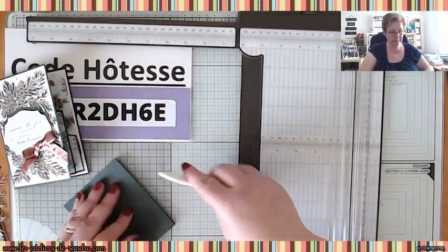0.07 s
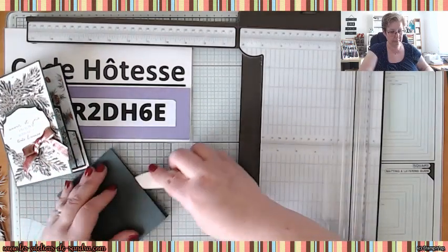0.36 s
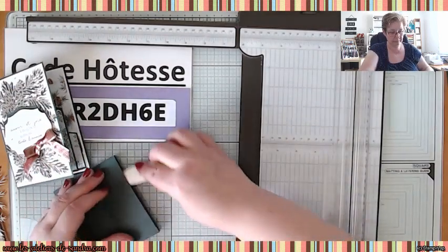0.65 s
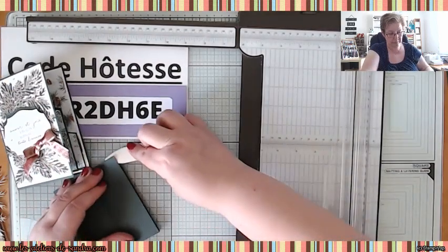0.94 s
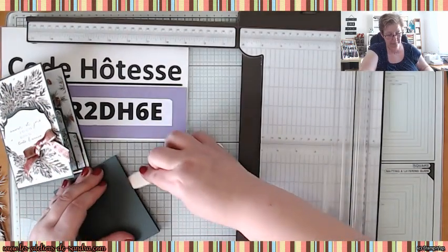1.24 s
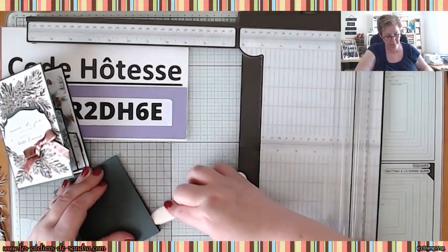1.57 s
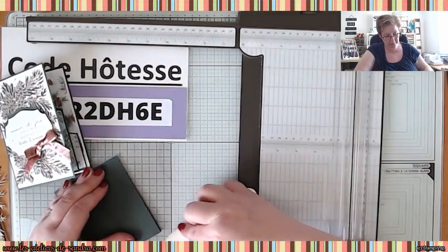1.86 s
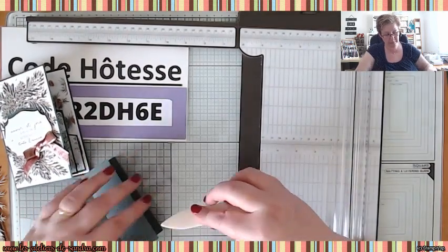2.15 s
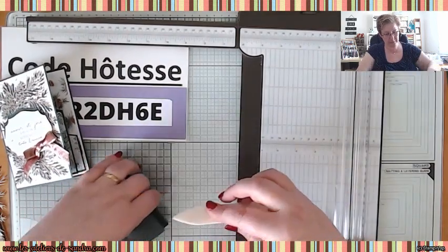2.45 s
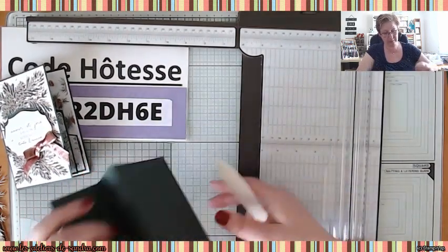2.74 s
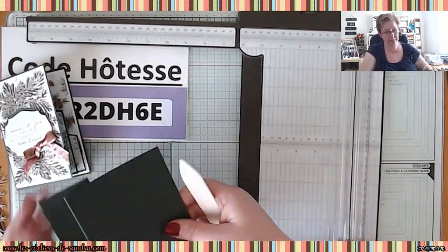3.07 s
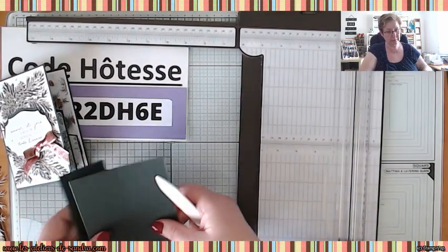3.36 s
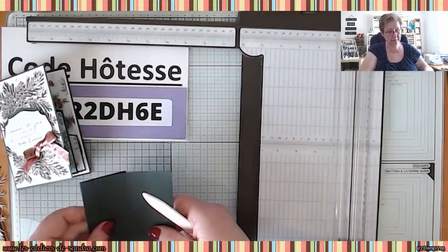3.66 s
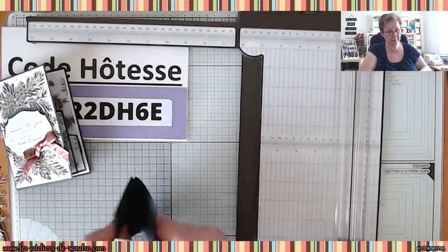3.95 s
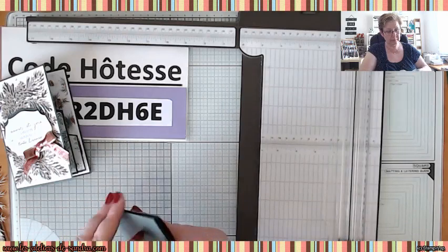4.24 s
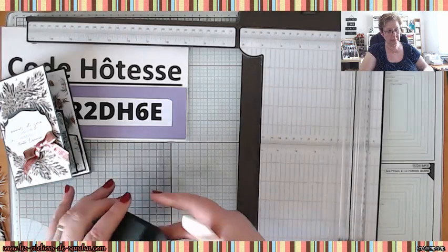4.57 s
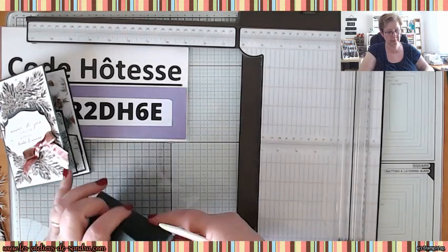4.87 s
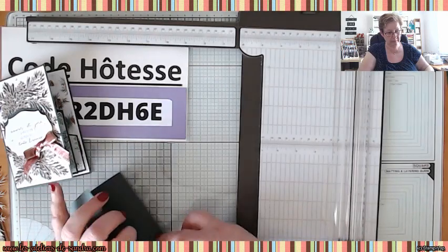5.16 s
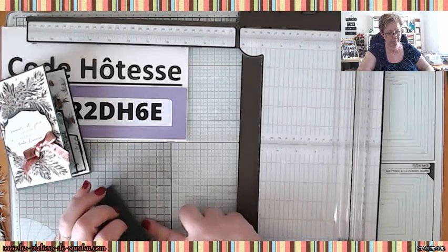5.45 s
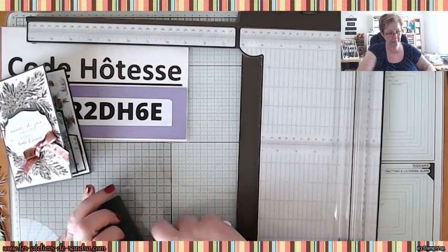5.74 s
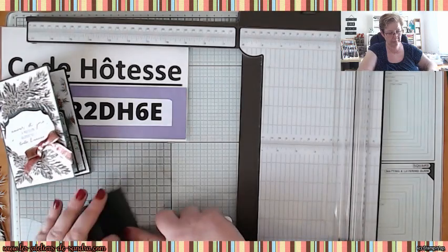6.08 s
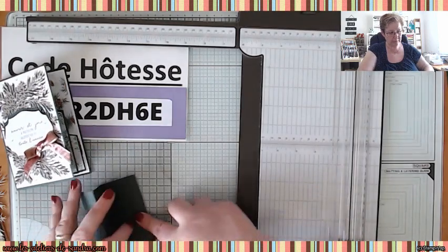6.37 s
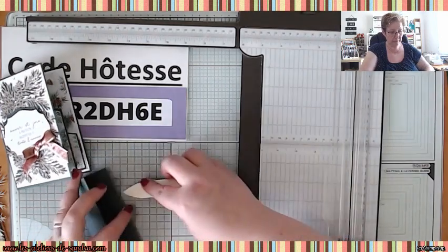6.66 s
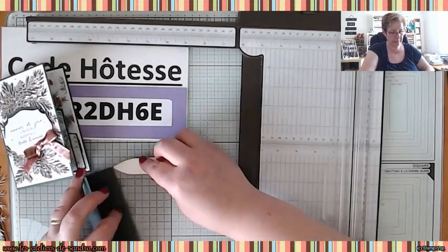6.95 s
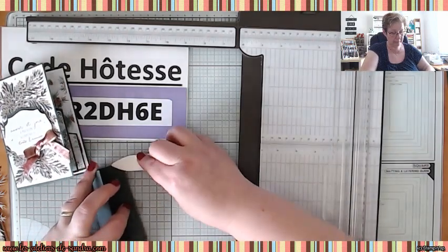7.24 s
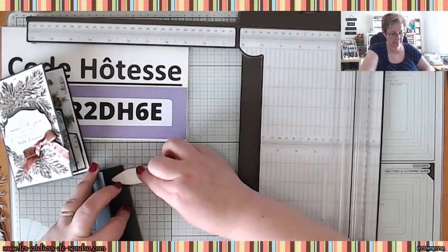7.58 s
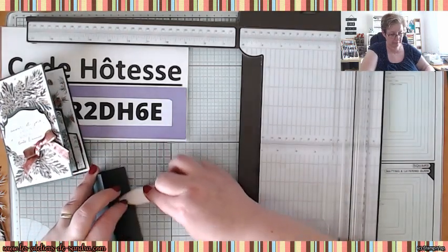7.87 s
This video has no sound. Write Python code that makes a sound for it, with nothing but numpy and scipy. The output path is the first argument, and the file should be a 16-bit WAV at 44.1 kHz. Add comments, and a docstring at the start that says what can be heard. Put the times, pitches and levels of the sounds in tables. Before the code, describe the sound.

A bone folder rubs softly along a fold in cardstock, its tip clicking lightly over the edge. It slips off and snaps down hard on the table, by far the loudest sound. Fingers then hiss over the sheet as they turn and refold it, with dry ticks, scuffs and soft hand bumps. More short creasing strokes and taps follow, heard close in a small, quiet room.

```python
"""A bone folder creases cardstock on a craft table in a small room.
It rubs along the fold as paper fibres catch and let go. Its tip clicks over the card's far edge,
and once it slips off the near end and snaps down hard. Fingers hiss over the sheet as they turn it,
the flaps tick and buckle, and hands bump the table, all over a faint room tone."""
import sys
import numpy as np
from scipy import signal
from scipy.fft import rfft, irfft, next_fast_len
from scipy.io import wavfile
from scipy.ndimage import uniform_filter1d, map_coordinates

SR = 44100
rng = np.random.default_rng(int(sys.argv[2]) if len(sys.argv) > 2 else 0)


def wrap_up_sound(samples):
    """Save the sound to the file named by the first command line argument, as 16-bit audio."""
    columns = np.atleast_2d(samples).T
    # keep every value between -1 and 1, then stretch to whole-number steps
    tamed = np.clip(columns, -1, 1)
    steps = np.round(tamed * 32767).astype(np.int16)
    wavfile.write(sys.argv[1], SR, steps)


N = 348827


def amp(db):
    """Decibels to gain."""
    return 10 ** (np.asarray(db) / 20)


def unit(x):
    """Scale to rms 1."""
    return x / np.sqrt(np.mean(x ** 2) + 1e-20)


def along(points, hz):
    """Read (freq_hz, value) points on a log frequency axis."""
    freqs, values = np.transpose(points)
    return np.interp(np.log(hz + 1), np.log(freqs + 1), values)


def wobble(rate):
    """A smooth random curve, rate knots a second."""
    knots = rng.standard_normal(int(N * rate / SR) + 4)
    return map_coordinates(knots, [np.arange(N) * rate / SR])


def filtered(x, response):
    """Filter x by the gain response(hz)."""
    size = next_fast_len(len(x) + 8192)
    return irfft(rfft(x, size) * response(np.fft.rfftfreq(size, 1 / SR)), size)[:len(x)]


def coloured(x, eq):
    """x through a (freq_hz, gain_db) EQ, at rms 1."""
    return unit(filtered(x, lambda hz: amp(along(eq, hz))))


def impulse(gain, size=4096):
    """The minimum-phase click whose spectrum is gain(hz)."""
    spectrum = np.maximum(gain(np.fft.rfftfreq(size, 1 / SR)), 1e-7)
    cepstrum = irfft(np.log(spectrum))
    cepstrum[1:size // 2] *= 2
    cepstrum[size // 2 + 1:] = 0
    return irfft(np.exp(rfft(cepstrum)))


def resonances(modes, hz):
    """Gain of a bank of steep-sided resonances."""
    return np.sqrt(sum(amp(db) ** 2 * np.abs(hz * width / (pitch ** 2 - hz ** 2 + 1j * hz * width)) ** 3
                       for pitch, width, db in modes))


def add(track, start_s, sound):
    """Mix a sound into the track."""
    part = track[max(round(start_s * SR), 0):][:len(sound)]
    part += sound[:len(part)]


def sweeps(rows, ends_db):
    """Envelope of sliding gestures: each swells and fades with hand speed, ends_db down at its ends."""
    t = np.arange(N) / SR
    return np.sqrt(sum(amp(db - np.minimum(ends_db * (2 * (t - peak_s) / length_s) ** 2, 100)) ** 2
                       for peak_s, length_s, db in rows))


# Room tone EQ: freq_hz, gain_db
ROOM_TONE_EQ = [(20, -9), (50, -5), (80, -11), (130, -10.5), (200, -13.5), (320, -16.5), (420, -11.5),
                (560, -20), (1200, -23), (2400, -27.5), (4000, -33.5), (16000, -34.5)]
def room_tone(level_db=-75):
    """A faint, steady bed of dark noise."""
    return amp(level_db) * coloured(rng.standard_normal(N), ROOM_TONE_EQ)


# Reverb time of the small room: freq_hz, t60_s
ROOM_DECAY = [(150, 0.36), (700, 0.24), (1600, .23), (3500, .26), (8000, .24), (15000, .23)]
def in_room(sound, near_db, near_t60, room_db, bright_db, direct_hz):
    """Low-passed direct sound, near scatter off the table top, and a brightened tail from the walls."""
    t = np.arange(SR // 2) / SR
    near = rng.standard_normal(len(t)) * amp(-60 * t / near_t60) * (1 - np.exp(-t / 0.00065))
    hz, when, bands = signal.stft(rng.standard_normal(len(t)), SR, nperseg=256)
    bands *= amp(-60 * when / along(ROOM_DECAY, hz)[:, None])
    tail = signal.istft(bands, SR, nperseg=256)[1][:len(t)]
    tail *= 1 - np.exp(-(t / 0.004) ** 2)
    tail = filtered(tail / np.linalg.norm(tail), lambda f: amp(along([(1500, 0), (7000, bright_db)], f)))
    paths = amp(near_db) * near / np.linalg.norm(near) + amp(room_db) * tail
    add(paths, 0, impulse(lambda f: 1 / np.hypot(1, (f / direct_hz) ** 2)))
    return signal.fftconvolve(sound, paths)


def friction(eq, slips_per_s, slip_share):
    """Paper fibres catch and let go: a dense rush with scattered larger slips, which the room answers."""
    slips = (rng.random(N) < slips_per_s / SR) * rng.standard_normal(N)
    slips = in_room(slips, near_db=1.5, near_t60=0.021, room_db=-1, bright_db=3.5, direct_hz=4500)[:N]
    rush = rng.standard_normal(N)
    return coloured(np.sqrt(1 - slip_share) * rush + np.sqrt(slip_share) * unit(slips), eq)


# Soft hand thumps: start_s, relative_level_db, pitch_hz
HAND_BUMPS = [(0.141, -53, 64), (0.653, -55, 63), (1.143, -60, 106), (1.708, -59.5, 61.8),
              (1.82, -55.5, 105), (2.09, -54, 113), (2.407, -47, 182.6), (2.464, -46, 144),
              (2.649, -48.5, 109), (2.856, -52.5, 62.3), (3.002, -48, 60), (3.141, -50, 136.5),
              (3.399, -47.5, 114), (4.195, -58, 147), (4.425, -55, 181), (4.604, -53.5, 174),
              (5.148, -45, 157.4), (5.757, -53, 102), (6.05, -42.5, 116), (6.786, -45.5, 115.5),
              (7.029, -53, 65)]
def hands_on_table(press, rest_db=-79, press_db=-7.5, settle_s=0.16):
    """Hands keep the table top rumbling in lumps, more as they press; each bump booms briefly."""
    t = np.arange(SR // 3) / SR
    rumble_eq = [(20, -1), (55, 3.5), (130, -1), (220, -9.5), (500, -20.5), (2000, -71.5)]
    thud_eq = [(25, -5), (150, 1.5), (350, -12.5), (1200, -43)]
    rumble = coloured(rng.standard_normal(N), rumble_eq)
    weight = amp(rest_db) + amp(press_db) * uniform_filter1d(press, int(settle_s * SR))
    out = weight * amp(2.5 * wobble(11)) * rumble
    envelope = amp(-60 * t / 0.24) * (1 - np.exp(-t / 0.0024))
    for start_s, db, hz in HAND_BUMPS:
        boom = np.sin(2 * np.pi * hz * t) + 0.58 * coloured(rng.standard_normal(len(t)), thud_eq)
        add(out, start_s, amp(db - 2.5) * boom * envelope)
    return out


# Fingers turning and folding the sheet: peak_s, length_s, level_db
FINGER_SWIPES = [(0.02, 0.25, -57.5), (0.22, 0.22, -64), (0.42, 0.25, -66.5), (0.73, 0.4, -67),
                 (2.65, 0.24, -61.5), (3.07, 0.17, -57.5), (3.23, 0.17, -59.5), (3.465, 0.11, -53),
                 (3.58, 0.16, -63), (3.79, 0.19, -66), (3.93, 0.2, -58.5), (4.04, 0.16, -59),
                 (4.22, 0.18, -60.5), (4.325, 0.17, -61), (4.44, .19, -59), (4.65, 0.38, -60.5),
                 (4.97, 0.17, -61), (5.17, 0.19, -59), (5.31, 0.12, -61), (5.5, 0.22, -56),
                 (5.82, 0.16, -69), (5.98, 0.41, -62), (6.29, 0.37, -65), (6.56, 0.43, -61.5),
                 (6.79, 0.32, -66.5), (7.39, 0.11, -66)]
def swipe_envelope():
    """The swell and fade of fingers sweeping over the card."""
    return sweeps(FINGER_SWIPES, ends_db=12.5)


# Bright EQ of sliding on paper: freq_hz, gain_db
HISS_EQ = [(300, -3.5), (1000, -4), (1600, -6.5), (2500, 0), (4500, 0), (7000, -1.5), (10000, -0.5),
           (14000, -1), (16000, -4)]
def finger_hiss(press, swipe, pressure):
    """Fingers hiss over the sheet; a press brings a little hiss too."""
    envelope = np.hypot(swipe, amp(-12) * press) * amp(1.5 + 0.5 * pressure)
    return envelope * friction(HISS_EQ, slips_per_s=220, slip_share=0.47)


# Hollow between hand, card and mat: pitch_hz, width_hz, gain_db
HOLLOW_MODES = [(620, 83, 8), (1120, 390, 2), (2160, 220, 4.5), (2920, 550, -2), (4480, 350, -5)]
# Pushes of the folded card: peak_s, length_s, level_db
CARD_PUSHES = [(4.67, 0.29, -60), (4.99, 0.29, -62), (6.28, 0.19, -64), (6.39, .1, -62)]
def cupped_slide(pressure):
    """The card slides under a cupped hand, whose hollow colours the friction."""
    hiss = friction(HISS_EQ, slips_per_s=250, slip_share=0.75)
    slide = unit(filtered(hiss, lambda hz: resonances(HOLLOW_MODES, hz)))
    return sweeps(CARD_PUSHES, ends_db=17.5) * amp(pressure) * slide


# The card's broad response to a contact: freq_hz, gain_db
CARD_EQ = [(120, -10.5), (400, -11), (650, -1.5), (1500, -3), (3000, -3.5), (4200, -6), (6000, -10.5),
           (9000, -15.5), (15000, -16.5)]
# Bending modes of the folded sheet: pitch_hz, width_hz, gain_db
BENDING_MODES = [(663, 140, 2), (1065, 240, 6.5), (2230, 400, -0.5)]
def card_contact(body_db, crisp_db, grip_db):
    """One damped tap: body sets the lows, crispness the highs; each grip shifts the EQ and modes."""
    touch_eq = [(850, body_db), (1750, 0), (2300, 0), (4200, crisp_db)]
    grip_hz = np.geomspace(400, 6000, 28)
    grip_eq = np.column_stack([grip_hz, rng.normal(0, grip_db, len(grip_hz))])
    tuning = np.exp(rng.normal(0, 0.15))
    return impulse(lambda hz: amp(along(CARD_EQ, hz) + along(touch_eq, hz) + along(grip_eq, hz))
                   * np.hypot(1, resonances(BENDING_MODES, hz / tuning)))


def card_crackle(swipe, snaps_per_s=28, spread_db=2.5):
    """The sheet flexes under the moving fingers and gives off scattered tiny snaps."""
    snaps = (rng.random(N) < snaps_per_s / SR) * amp(spread_db * np.clip(rng.standard_normal(N), -2, 2))
    snaps = in_room(snaps, near_db=-0.5, near_t60=0.013, room_db=-5, bright_db=4, direct_hz=9000)[:N]
    return amp(-13) * swipe * coloured(snaps, CARD_EQ)


# Card flicks and fingertip taps: start_s, relative_level_db, body_db, crisp_db
CARD_TICKS = [(0.127, -57.5, 16.5, -3), (0.369, -37.5, -13, -8), (0.406, -40, -14, -7.5),
              (0.598, -42, -14, -6), (1.817, -55, 2, -9), (2.087, -58, 15.5, -10), (2.586, -35, -3, -9),
              (2.848, -62.5, 17.5, -6), (2.96, -48.5, 6, 0), (3.003, -41, 8, 0.5), (3.171, -33.5, -3.5, -3),
              (3.394, -56.5, 15.5, 11), (3.48, -31.5, -9.5, -1), (3.84, -49.5, 2.5, -6),
              (4.066, -34, -4.5, 5.5), (4.191, -43, 12.5, 8), (4.61, -59, 16, -5), (4.917, -39, 2.5, -8),
              (5.146, -26, 0, -9), (5.268, -26, -3, -27), (5.388, -37.5, -4, -22), (5.451, -28, -1.5, -19),
              (5.752, -45, 8.5, -4), (5.79, -39, 0, -1), (6.388, -35.5, 6, -12), (6.469, -25, -8, -3),
              (6.757, -25, -3.5, -14.5), (6.899, -32.5, -16, -11.5), (7.02, -61.5, 15, -13),
              (7.17, -39.5, -20, -9.5), (7.865, -59, 20, -6)]
def card_ticks(tick_delay_s=0.001498):
    """Single dry contacts: a wide flap gives more body, a nail or an edge more crispness."""
    out = np.zeros(N)
    for start_s, db, body_db, crisp_db in CARD_TICKS:
        tick = card_contact(body_db, crisp_db, grip_db=3)
        tick = in_room(tick, near_db=-2, near_t60=0.014, room_db=-3, bright_db=6, direct_hz=6000)
        add(out, start_s + tick_delay_s, amp(db + 19.5) * tick)
    return out


# Short skids: start_s, relative_level_db, body_db, crisp_db
CARD_SCUFFS = [(0.026, -37.5, 3, -11), (0.185, -39.5, -6, -11), (2.581, -29.5, 0, -10),
               (2.644, -41.5, 3, -1), (2.682, -43, 4.5, 9.5), (3.056, -28.5, -1, -7), (3.069, -28, -10, 0),
               (3.137, -35.5, -11, 1), (3.281, -39, 2.5, -5), (4.432, -35, 2.5, -4), (5.15, -31, 0.5, -10),
               (5.496, -34.5, 6, -10), (6.045, -31, -3, -6.5), (6.461, -27.5, -7.5, -2),
               (6.572, -34, -7, 0), (6.851, -36.5, -7.5, -14), (6.946, -39, -4, -11),
               (7.388, -34.5, -6.5, -10)]
def card_scuffs():
    """An edge or a nail skids: strong scatter smears one contact into a quick run of tiny ones."""
    out = np.zeros(N)
    for start_s, db, body_db, crisp_db in CARD_SCUFFS:
        scuff = card_contact(body_db, crisp_db, grip_db=4.5)
        scuff = in_room(scuff, near_db=11, near_t60=0.062, room_db=5.5, bright_db=4, direct_hz=2500)
        add(out, start_s, amp(db + 8.5) * scuff)
    return out


# Edge slaps with a three-band EQ: start_s, relative_level_db, body_db, mid_db, edge_db
EDGE_SLAPS = [(2.399, -32.5, -12.5, -19.5, -10), (2.452, -33, -13, -15, -10)]
def edge_slaps():
    """The card's edge is plucked off the mat and slaps back."""
    out = np.zeros(N)
    for start_s, db, body_db, mid_db, edge_db in EDGE_SLAPS:
        eq = [(200, body_db - 0.5), (650, body_db + 1), (1150, body_db - 8.5), (2000, mid_db - 0.5),
              (3300, edge_db - 3), (5200, edge_db - 5.5), (7000, edge_db - 14.5), (14000, edge_db - 25)]
        slap = impulse(lambda hz: amp(along(eq, hz)))
        slap = in_room(slap, near_db=11, near_t60=0.053, room_db=10.5, bright_db=4, direct_hz=5000)
        add(out, start_s, amp(db + 25.5) * slap)
    return out


# Folder or thumb pressed along the card: start_s, length_s, level_db
PRESSES = [(0.173, 0.052, -58.5), (0.352, 0.19, -69), (0.617, 0.13, -60.5), (1.062, 0.57, -66),
           (2.515, 0.11, -58), (2.98, 0.11, -62), (3.254, 0.051, -64.5), (3.39, 0.044, -66.5),
           (3.836, 0.15, -69), (5.138, 0.5, -64.5), (5.775, 0.33, -61), (6.422, 0.25, -61.5),
           (6.81, 0.33, -73), (7.155, 0.05, -72), (7.314, 0.067, -63), (7.572, 0.055, -73.5),
           (7.744, 0.14, -62.5)]
def press_envelope(attack_s=0.023, sag_db_per_s=3, release_db_per_s=150.5):
    """Each press bites quickly, eases while it is held, and dies as the hand lifts."""
    t = np.arange(N) / SR
    out = np.zeros(N)
    for start_s, length_s, db in PRESSES:
        age = t - start_s
        sag_db = sag_db_per_s * np.clip(age, 0, length_s)
        release_db = release_db_per_s * np.clip(age - length_s, 0, 1)
        out += np.clip(age / attack_s, 0, 1) * amp(db - sag_db - release_db)
    return out


# Dull EQ of rubbing on card: freq_hz, gain_db
RUB_EQ = [(200, -12), (450, -8.5), (750, -2), (1050, -4.5), (1400, -3), (1800, 0), (2400, -6), (3300, -7.5),
          (4500, -15.5), (6500, -18.5), (16000, -33)]
def folder_rub(press, swipe, pressure):
    """The folder rubs along the crease with uneven pressure; a finger swipe rubs faintly too."""
    envelope = np.hypot(press, amp(-15.5) * swipe) * amp(pressure)
    return envelope * friction(RUB_EQ, slips_per_s=400, slip_share=0.5)


# Ring of the folder's tip: pitch_hz, width_hz, gain_db
TIP_MODES = [(600, 1500, -7), (1110, 140, -1), (1355, 120, 9), (1940, 480, 2), (2800, 1100, -9.5),
             (3860, 520, 2), (4350, 150, -3.5), (5700, 430, -6), (8100, 600, -19), (11000, 9900, -31.5)]
# Light tip clicks: start_s, relative_level_db
TIP_DROPS = [(0.8854, -39.5), (7.3201, -41)]
def folder_clicks():
    """The hard tip drops over the card's far edge and rings briefly."""
    out = np.zeros(N)
    ring = impulse(lambda hz: resonances(TIP_MODES, hz))
    for start_s, db in TIP_DROPS:
        click = in_room(ring, near_db=2.5, near_t60=0.063, room_db=0.5, bright_db=5.5, direct_hz=5000)
        add(out, start_s, amp(db + 21.5) * click)
    return out


# Ring of folder and work surface: pitch_hz, width_hz, gain_db
SNAP_MODES = [(170.5, 200, -25.5), (702.6, 170, -8.5), (1044, 180, 1), (1280, 82, -0.5), (1467, 150, 4),
              (1760, 220, 1), (1950, 160, 4.5), (3200, 640, -2.5), (3430, 180, -1.5), (3640, 170, 2.5),
              (4480, 230, -6.5), (5000, 350, -6), (5735, 190, -5), (6520, 220, -4), (6700, 150, -6),
              (8770, 1130, -11.5), (10440, 400, -12), (10700, 17000, -16), (11980, 650, -6),
              (14400, 1500, -12)]
# Rapid hits within the one loud snap: start_s, relative_level_db
SNAP_HITS = [(1.8684, -37.5), (1.8715, -5.5), (1.8737, -2.5), (1.8781, -5.5)]
def folder_snap():
    """The folder slips off the near end, snaps down and chatters on the work surface."""
    out = np.zeros(N)
    ring = impulse(lambda hz: resonances(SNAP_MODES, hz))
    for start_s, db in SNAP_HITS:
        hit = in_room(ring, near_db=-2, near_t60=0.013, room_db=-3.5, bright_db=5, direct_hz=3486)
        add(out, start_s, amp(db + 18) * hit)
    return out


def scene():
    """Mono mix of friction, card and knocks over the room tone."""
    bed = room_tone()
    press, swipe = press_envelope(), swipe_envelope()
    pressure = wobble(66)  # uneven hand pressure, shared by the three friction layers
    strokes = folder_rub(press, swipe, pressure) + finger_hiss(press, swipe, pressure)
    strokes += cupped_slide(pressure)
    card = card_crackle(swipe) + card_ticks() + card_scuffs() + edge_slaps()
    knocks = folder_snap() + folder_clicks() + hands_on_table(press)
    return (bed + strokes + card + knocks)[None]


def record(dry):
    """The microphone's band limit: a steep high cut."""
    top_hz = 15850
    return np.array([filtered(ch, lambda hz: 1 / np.sqrt(1 + (hz / top_hz) ** 200)) for ch in dry])


dry = scene()
out = record(dry)
wrap_up_sound(out)
```